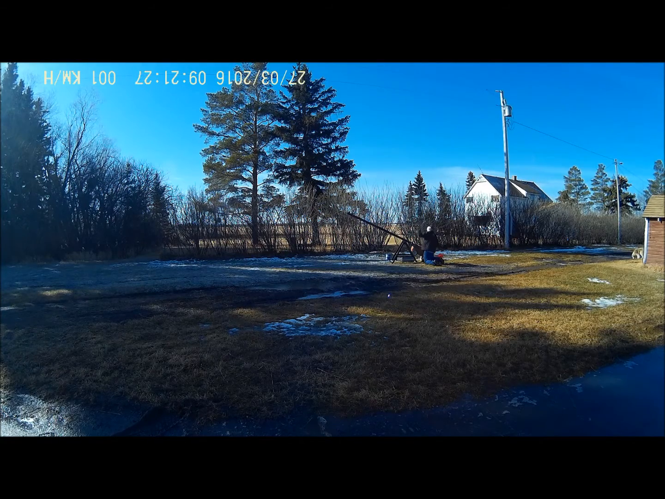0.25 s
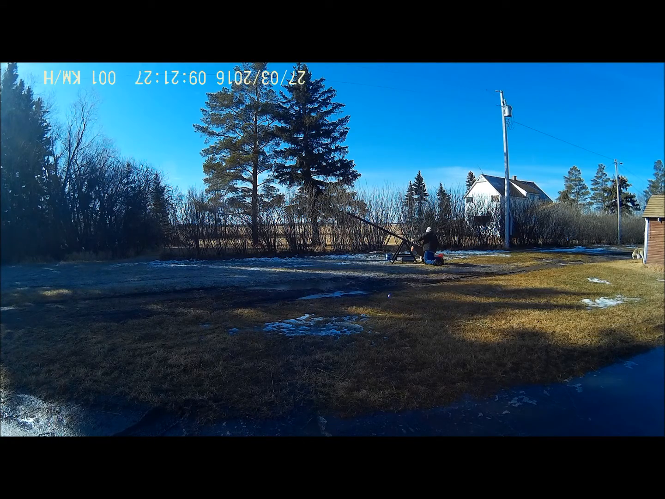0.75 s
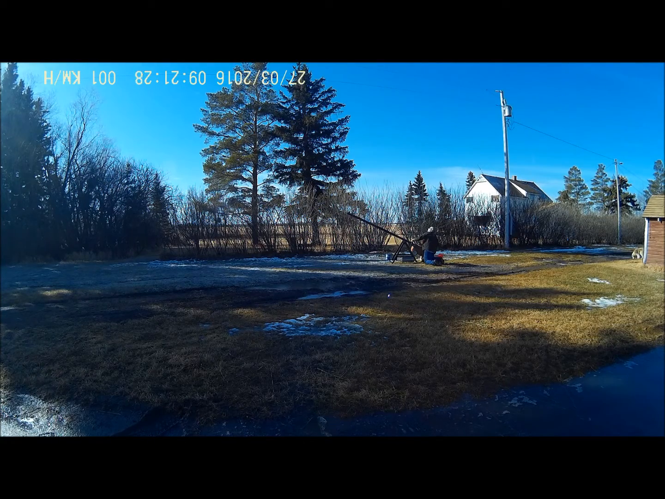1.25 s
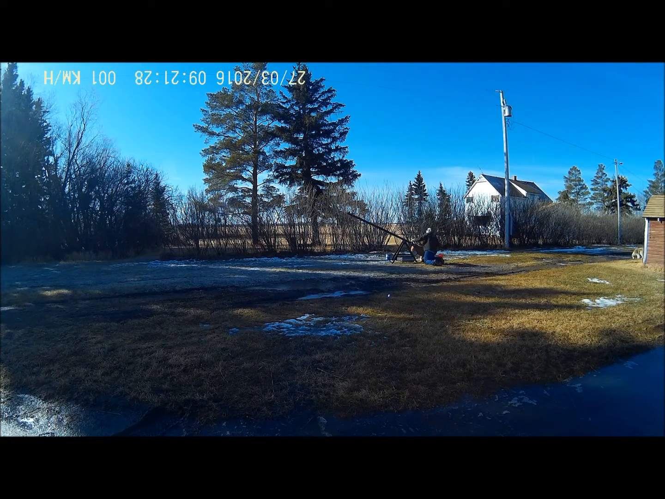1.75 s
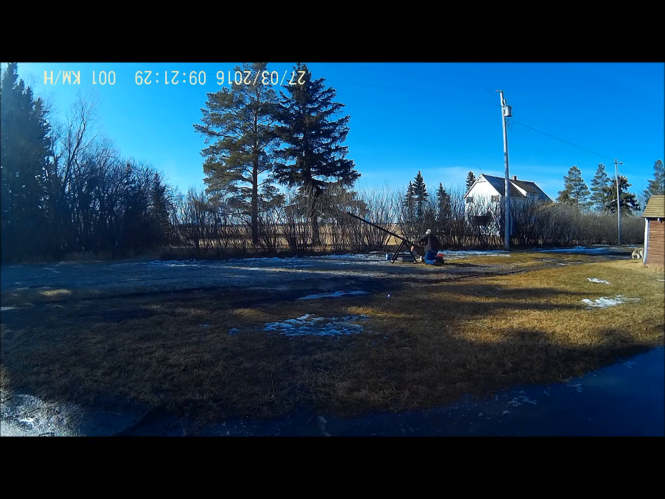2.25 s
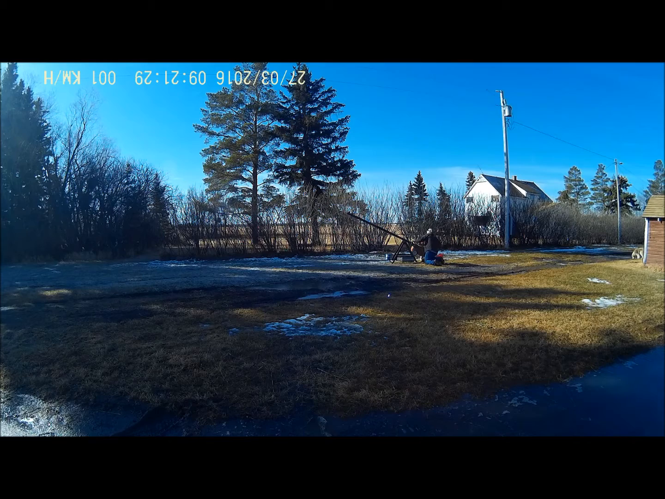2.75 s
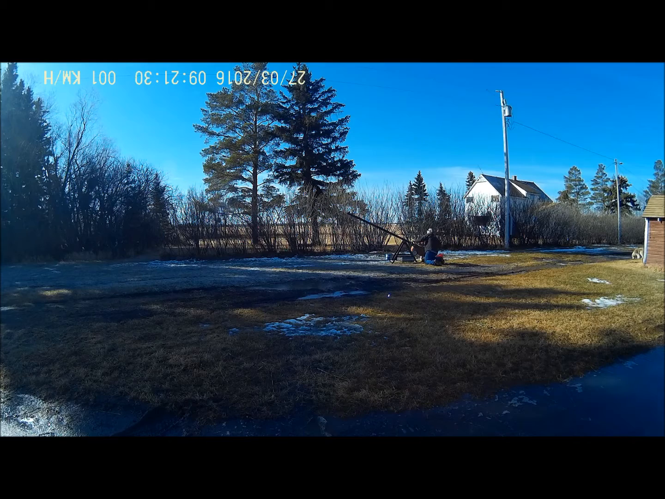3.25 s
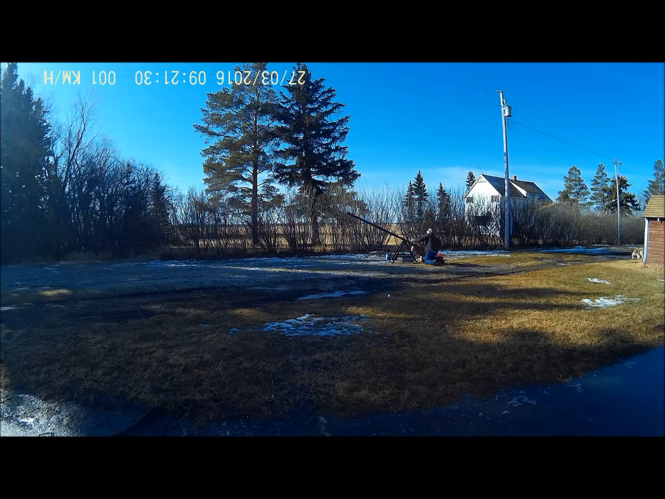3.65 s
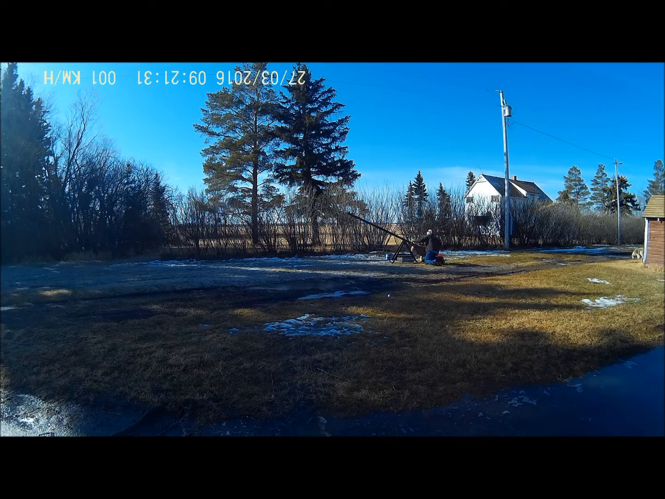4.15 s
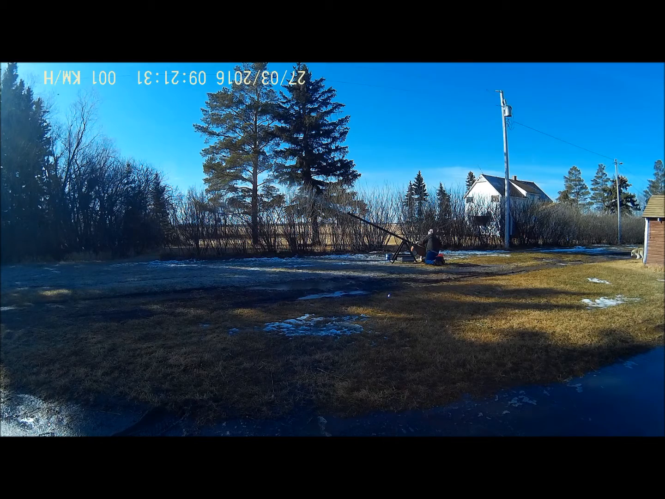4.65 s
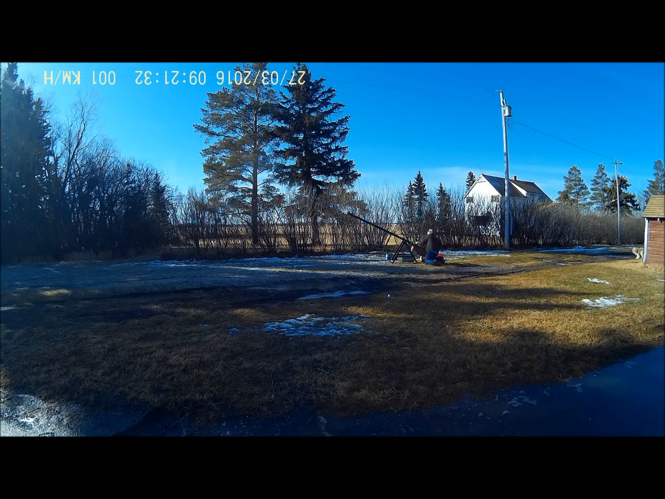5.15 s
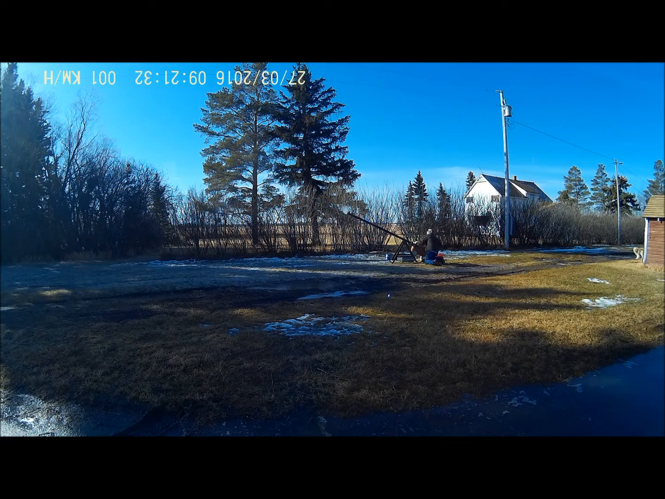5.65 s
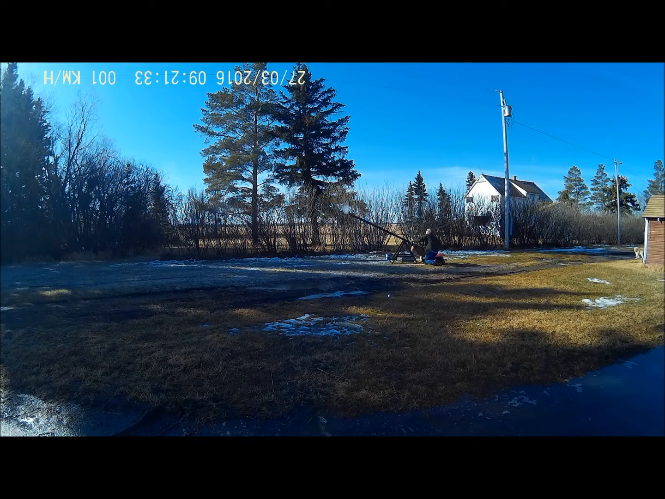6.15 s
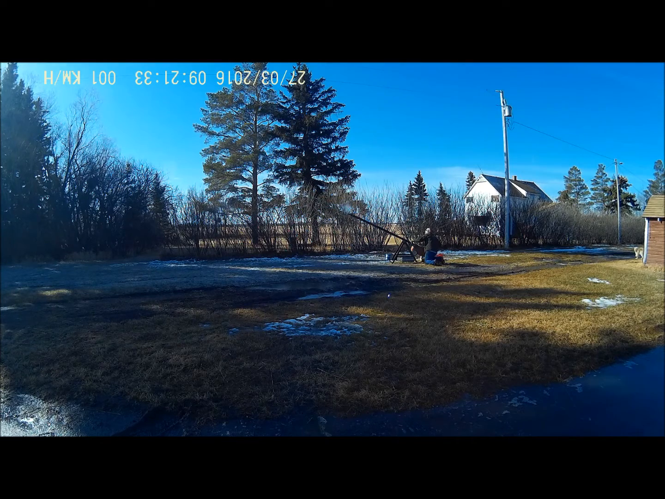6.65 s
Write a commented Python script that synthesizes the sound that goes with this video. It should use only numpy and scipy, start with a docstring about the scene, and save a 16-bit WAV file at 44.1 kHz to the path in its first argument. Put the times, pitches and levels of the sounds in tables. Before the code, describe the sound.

Faint songbird chirps and an occasional distant reedy call sit over quiet outdoor noise and a thin electronic buzz-whine. A compressed-air cannon across the yard suddenly fires: swelling hiss, sharp distorted crack, short boom, barrel note and rough rapid echo. Within a second come small clacks and one louder clattering thud, with a faint wavering ring afterward. Mono, slightly dull camera microphone.

```python
"""Compressed-air cannon in a farmyard

Air rushes down a barrel for about 80 ms (shaped noise), then bursts out as steep pressure fronts and a crack.
Trees and buildings return it as decaying noise; light knocks and a smaller bang follow (noise and modes).
Faint birds (gliding sines), low wind (noise) and a thin electronic whine (a restarted sine) lie underneath.
The small camera that hears it overloads: peaks are clipped, then the band is limited."""
import sys
import numpy as np
from scipy import signal
from scipy.fft import rfft, irfft
from scipy.io import wavfile
from scipy.ndimage import uniform_filter1d

SR = 44100
rng = np.random.default_rng(int(sys.argv[2]) if len(sys.argv) > 2 else 0)


def log_audio(samples):
    """Write samples as a 16-bit WAV file to the path given in sys.argv[1]."""
    # one column per channel
    frames = np.atleast_2d(samples).T
    # limit to full scale, then quantise
    limited = np.clip(frames, -1, 1)
    pcm = np.round(limited * 32767).astype(np.int16)
    wavfile.write(sys.argv[1], SR, pcm)


N = 304290
TIME = np.arange(N) / SR  # [s]
BINS = np.fft.rfftfreq(N, 1 / SR)  # [Hz]
VALVE_S, MUZZLE_S = 4.451, 4.533  # the valve opens; the air bursts from the muzzle


def amp(db):
    """Decibel law: converts a level to an amplitude gain."""
    return 10 ** (np.asarray(db) / 20)


def unit(x):
    """Normalization: scales a signal to rms 1."""
    return x / np.sqrt(np.mean(x ** 2) + 1e-20)


def colour(points, hz=BINS):
    """Spectral envelope: gain interpolated in decibels over log frequency."""
    f, db = np.transpose(points)
    return amp(np.interp(np.log(hz + 1), np.log(f + 1), db))


def resonances(peaks):
    """Resonance: bell-shaped gains around each frequency, summed in power."""
    power = sum((amp(db) / (1 + ((BINS - hz) / width) ** 2)) ** 2 for hz, width, db in peaks)
    return np.sqrt(power)


def noise(gain):
    """Filtered noise: white noise given a gain over frequency, at rms 1."""
    white = rng.standard_normal(N)
    return unit(irfft(rfft(white) * gain, N))


def steadied(x, size):
    """Envelope flattening: holds noise power steady over size samples, keeping the fine grain."""
    power = abs(uniform_filter1d(x ** 2, size))
    return x / np.sqrt(power + 1e-9)


def drift(rate_hz):
    """Random modulation: low-passed noise of rms 1."""
    return noise(np.exp(-(BINS / rate_hz) ** 2))


def ring(modes):
    """Modal decay: a sum of sines, each losing 60 dB in its t60."""
    t = TIME[:SR // 2]
    return sum(amp(db - 60 * t / t60) * np.sin(2 * np.pi * hz * t) for hz, db, t60 in modes)


def add(mix, s, sound):
    """Superposition: adds a sound into the mix at time s."""
    part = mix[max(round(s * SR), 0):][:len(sound)]
    part += sound[:len(part)]


def scatter(x, t60):
    """Diffuse reflection from ground and nearby walls: convolution with decaying noise."""
    t = TIME[:SR]
    decay = amp(-60 * t / t60) * (1 - np.exp(-t / 0.0024))
    taps = rng.standard_normal(SR) * decay
    return signal.fftconvolve(x, taps / np.linalg.norm(taps))[:N]


def swell(s, db, rise_db_per_s, fall_db_per_s, hold=0):
    """Exponential growth and decay: gain climbs to db at time s, holds, and dies away."""
    rise = rise_db_per_s * np.maximum(s - TIME, 0)
    fall = fall_db_per_s * np.maximum(TIME - s - hold, 0)
    return amp(db - rise - fall)


# spectrum of the outdoor air and the microphone's hiss: (frequency [Hz], relative density [dB per Hz])
AIR_COLOUR = [(20, -3), (60, -4), (125, 0), (200, -8.5), (300, -11.5), (480, -13), (750, -16.5),
              (1200, -20.5), (2300, -22.5), (7000, -24.5), (11000, -24.5), (15000, -26)]
AIR_DB = -61.5


def background():
    """Broadband ambience: outdoor air over microphone hiss, low gusts and a rumble that dies away."""
    air = amp(AIR_DB) * noise(colour(AIR_COLOUR))
    gust_colour = colour([(20, -4), (120, 1.0), (200, -5.0), (500, -36.5), (2000, -70)])
    gusts = amp(-73.5 + 3.3 * drift(4.9)) * noise(gust_colour)
    rumble_colour = colour([(80, -54), (480, 10), (850, -3.5), (1600, -24), (5000, -47)])
    rumble = noise(rumble_colour) * swell(0, -70, rise_db_per_s=0, fall_db_per_s=16.5, hold=0.37)
    return air + gusts + rumble


WHINE_HZ, FRAME_HZ, WHINE_DB = 7933, 60.324, -69.5


def whine():
    """Periodic phase reset: a tone restarts each camera frame and buzzes; it swells after the blast."""
    surge = swell(4.69, -56.5, rise_db_per_s=95, fall_db_per_s=101, hold=0.054)
    settling = swell(4.8, -70.5, rise_db_per_s=95, fall_db_per_s=29, hold=0.35)
    time_in_frame = TIME % (1 / FRAME_HZ)
    tone = np.sqrt(2) * np.sin(2 * np.pi * WHINE_HZ * time_in_frame)
    return tone * (amp(WHINE_DB) + surge + settling)


# drawn-out calls: (time [s], length [s], base partial at mid-call [Hz], level [dB],
# overtone strength [dB])
FAR_CALLS = [(.075, 0.31, 1792, -68, -20), (3.252, 0.26, 1780, -71, -6.5), (3.5, 0.07, 1760, -64, -25),
             (4.35, 0.24, 1800, -71.5, 2.5)]
# reedy overtones: (multiple of the base partial, relative level [dB])
FAR_OVERTONES = [(1.5, -1.5), (2, -1.5)]
FAR_SAG_HZ_PER_S = 69


def far_bird(uneven_db=1.8):
    """Partial series: a far bird's reedy calls, each one wavering note that sinks slightly."""
    out, waver = np.zeros(N), 1 + 0.0089 * drift(58)
    for s, length, hz, db, reed_db in FAR_CALLS:
        t = np.arange(0, length, 1 / SR)
        sinking_hz = hz - FAR_SAG_HZ_PER_S * (t - length / 2)
        phase = 2 * np.pi * np.cumsum(sinking_hz * np.interp(s + t, TIME, waver)) / SR
        overtones = sum(amp(part_db) * np.sin(k * phase) for k, part_db in FAR_OVERTONES)
        call = unit(np.sin(phase) + amp(reed_db) * overtones)
        add(out, s, amp(db) * call * signal.windows.tukey(len(t), .3))
    return out * amp(uneven_db * drift(25))


# syllables sung: (time [s], kind, level [dB], pitch factor)
SONG = [(.236, "chirrup", -64, 1.005), (0.664, "slide", -70, 0.89), (.745, "slur", -67.5, 0.98),
        (1.006, "slur", -71, 1.37), (1.11, "flick", -71, 0.97), (1.202, "twitter", -58.5, 1),
        (1.636, "slur", -66, .98), (1.9, "chirrup", -64, 1.01), (2.079, "slur", -69.5, 1.3),
        (2.185, "flick", -68, 0.94), (2.437, "slur", -68, .96), (2.54, "slide", -74, 1.13),
        (2.856, "twitter", -60, 0.99), (3.125, "slide", -67.5, 0.92), (3.201, "slur", -68, 0.98),
        (3.452, "flick", -70, 1.2), (3.468, "slur", -67.5, 1.39), (3.568, "flick", -67, 0.97),
        (3.595, "slide", -76, 1.1), (3.933, "twitter", -62.5, 1), (4.03, "slur", -67, 1.38),
        (4.112, "slur", -67.5, 0.95)]
# notes of each kind of syllable: (delay [s], length [s], first pitch [Hz], last pitch [Hz],
# arch height [Hz], relative level [dB]); the pitch factor scales all three pitches
SYLLABLES = { "chirrup": [(0, .053, 3650, 3350, 1850, 3), (.056, .02, 3550, 3400, 0, -2.5),
             (.081, .029, 3340, 4480, 3, -1.5)], "twitter": [(0, .023, 5900, 3730, 706, -3.5),
             (.021, .022, 6100, 5480, -3, -1), (.036, .031, 3900, 3800, 2100, -2.5),
             (.066, .062, 5473, 6100, 0, -7)], "slur": [(.006, .064, 2897, 2300, 421.2, -1)],
             "slide": [(0, .075, 4800, 3150, 0, -4)], "flick": [(0, 0.0306, 3500, 4200, 195, 0)]}
ARCH_FLATNESS = 2.4  # 2 is a round arch; more flattens its top


def songbird(flutter=.013, flutter_db=2.0):
    """Frequency modulation: a small bird's fluttering whistles glide between pitches over an arch."""
    out = np.zeros(N)
    waver, tremble = 1 + flutter * drift(180), amp(flutter_db * drift(90))
    for s, kind, db, pitch in SONG:
        for delay, length, first_hz, last_hz, arch_hz, note_db in SYLLABLES[kind]:
            u = np.linspace(0, 1, round(length * SR))
            arch = arch_hz * (1 - abs(2 * u - 1) ** ARCH_FLATNESS)
            hz = pitch * (first_hz + (last_hz - first_hz) * u + arch)
            turns = np.cumsum(hz * np.interp(s + delay + u * length, TIME, waver)) / SR
            note = np.sin(2 * np.pi * turns) * signal.windows.tukey(len(u), .4)
            add(out, s + delay, amp(db + note_db) * note)
    return out * tremble


def birds():
    """Multiple scattering: the trees soften both birds by adding diffuse reflections."""
    calls = songbird() + far_bird()
    return calls + amp(-8.5) * scatter(calls, t60=0.37)


# contacts after the shot: (time [s], crunch level [dB], contact length [s],
# thud relative to crunch [dB], pitch factor)
KNOCKS = [(4.788, -32, 0.0018, -25, 1.2), (4.948, -47.5, 0.0068, -25, 1), (5.078, -42, 0.0074, -11, 1.7),
          (5.084, -37.5, 0.0067, -4.5, 1.5), (5.105, -34.5, 0.0022, -3, 1.6),
          (5.2051, -33, 0.01, -23, 0.84), (5.2146, -23.5, 0.0037, 4.5, 1), (5.219, -25, 0.0042, -12, 1.1),
          (5.284, -49, .004, -15, 1.1)]
# spectrum of the crunch: (frequency [Hz], relative density [dB per Hz])
KNOCK_COLOUR = [(60, -14.5), (200, -9), (520, -5), (700, -3), (870, 3), (1150, -0.5), (1500, 4),
                (2100, -13), (3700, -10), (5200, -16), (9500, -20.5), (15500, -42)]
# modes of the struck thing, before the pitch factor: (frequency [Hz], relative level [dB], t60 [s])
STRUCK_MODES = [(233, -13, 0.035), (532, -12, 0.078), (583, 0.5, 0.042), (820, -10.5, 0.045),
                (1157, -11, 0.049), (1433, -9, 0.056), (2456, -18, 0.066), (3630, -26, 0.057)]


def knocks(rattle_db=-16, rattle_t60=0.19):
    """Impact excitation: crunching contacts ring the struck thing's modes and trail a fine rattle."""
    out, t = np.zeros(N), TIME[:SR // 2]
    bass_loss = signal.butter(2, 300, "high", fs=SR, output="sos")  # small things radiate little bass
    for s, db, length, thud_db, pitch in KNOCKS:
        modes = [(hz * pitch, mode_db, t60) for hz, mode_db, t60 in STRUCK_MODES]
        thud = signal.sosfilt(bass_loss, ring(modes))
        crunch = steadied(noise(colour(KNOCK_COLOUR))[:len(t)], size=200)
        contact = np.exp(-(t / length) ** 2) * (1 - np.exp(-t / 0.0011))
        rattle = amp(rattle_db - 60 * t / rattle_t60) * (1 - np.exp(-t / length))
        add(out, s, amp(db) * (crunch * (contact + rattle) + amp(thud_db) * thud))
    return out + amp(-12) * scatter(out, t60=0.28)


# ringing that hangs in the air: (frequency at 5.55 s [Hz], level before the shared swell [dB])
AFTERRING = [(829, -78.5), (995, -77), (1244, -92), (1400, -104), (1680, -74.5)]


def afterring(rise=0.03, waver=0.011):
    """Lingering tones: faint sines waver at random and creep up in pitch after the shot."""
    glide = 1 + rise * np.clip(TIME - 5.55, -1, 1)
    tones = np.zeros(N)
    for hz, db in AFTERRING:
        wavering_hz = hz * glide * (1 + waver * drift(48.4))
        tones += amp(db + 2 * drift(30)) * np.sin(2 * np.pi * np.cumsum(wavering_hz) / SR)
    return tones * swell(5.33, 5.0, rise_db_per_s=102, fall_db_per_s=42, hold=0.4)


# spectrum of the returns: (frequency [Hz], relative density [dB per Hz])
ECHO_COLOUR = [(30, -23.5), (120, -11.5), (205, -5), (290, -14.5), (380, -8), (470, -8), (800, -3.5),
               (1280, -1.5), (1700, -4.5), (2200, -17.5), (3600, -21.5), (5500, -31), (9000, -41),
               (15500, -48.5)]
# resonances in the returns: (frequency [Hz], width [Hz], relative level [dB])
ECHO_RING = [(213.8, 13, -1), (365, 18, -3), (1020, 24, -0.5), (1273, 35, 4.5), (1500.5, 40, -4.5),
             (3047, 70, -14), (3620, 62, -19)]
# main echoes from tree lines and buildings: (time [s], level [dB])
ECHOES = [(4.592, -22.5), (4.622, -23), (4.648, -23.5), (4.671, -26), (4.722, -29), (4.765, -40),
          (4.828, -40.5), (4.865, -44), (4.928, -46.5)]
ECHO_RISE_DB_PER_S, ECHO_FALL_DB_PER_S = 420.5, 216  # the fall is for the main echoes
COUNTRY_DB, COUNTRY_FALL_DB_PER_S = -45, 22.5  # long tail from the land beyond


def yard_echo(bright_db=0.5, dulling_db_per_s=4, patchy_db=1.0):
    """Diffuse reverberation: trunks and walls return the blast; later returns have lost some treble."""
    plain = steadied(noise(colour(ECHO_COLOUR)), size=1200)
    resonant = steadied(noise(resonances(ECHO_RING)), size=1200)
    returns = unit((plain + amp(-5.5) * resonant) * amp(patchy_db * drift(120)))
    body = signal.sosfiltfilt(signal.butter(2, 2100, fs=SR, output="sos"), returns)
    treble_gain = amp(bright_db - dulling_db_per_s * np.clip(TIME - MUZZLE_S, 0, .45))
    # echoes add in power
    near = sum(swell(s, db, ECHO_RISE_DB_PER_S, ECHO_FALL_DB_PER_S) ** 2 for s, db in ECHOES)
    far = swell(4.62, COUNTRY_DB, ECHO_RISE_DB_PER_S, COUNTRY_FALL_DB_PER_S) ** 2
    return (body + treble_gain * (returns - body)) * np.sqrt(near + far)


def barrel_tone(hz=1312):
    """Pipe resonance: the emptying barrel sings one wavering note and stops; the yard carries it on."""
    phase = 2 * np.pi * np.cumsum(hz * (1 + 0.0081 * drift(60))) / SR
    direct = swell(4.69, -35, rise_db_per_s=60, fall_db_per_s=1200, hold=0.091) * (TIME > MUZZLE_S)
    carried = swell(4.72, -47, rise_db_per_s=200, fall_db_per_s=140, hold=.15)
    return np.sin(phase) * amp(2 * drift(40)) * (direct + carried)


# spectrum of the rushing air, also heard in the puff: (frequency [Hz], relative density [dB per Hz])
RUSH_COLOUR = [(60, -22.5), (400, -7.5), (700, 2), (1400, 1), (1750, -0.5), (2200, -14.5), (3600, -15),
               (5000, -21), (8000, -26), (11000, -27.5), (15500, -36)]


def puff(db=-19.5, hold=0.013):
    """Jet noise: air packed in the barrel escapes in one short puff just behind the burst."""
    rush = steadied(noise(colour(RUSH_COLOUR)), size=400)
    return rush * swell(4.535, db, rise_db_per_s=2999, fall_db_per_s=1300, hold=hold)


def jet(db, power, fall_db_per_s):
    """Power law of flow: gain grows from valve to muzzle, then falls as the tank runs empty."""
    flow = np.clip((TIME - VALVE_S) / (MUZZLE_S - VALVE_S), 0, 1)
    return flow ** power * amp(db - fall_db_per_s * np.maximum(TIME - MUZZLE_S, 0))


# spectrum of the low boom: (frequency [Hz], relative density [dB per Hz])
BOOM_COLOUR = [(20, -25.5), (70, -24), (118, 1), (155, -10), (215, 3), (400, -11.5), (600, -3),
               (900, -11.5), (1400, -31), (4000, -59)]
# barrel resonances: (frequency [Hz], width [Hz], relative level [dB])
BARREL = [(310, 25, -1.5), (678.6, 17, -1), (1320, 47, 9), (1544, 56, -5.5), (3480, 86, -10),
          (3850, 120, -13), (6990, 160, -21.5)]
# how each sound follows the flow: (level at the muzzle [dB], power of its growth, fall [dB per s])
RUSH_LAW = (-22, 0.95, 240)
BOOM_LAW = (-12.5, 2.3, 470)
WHISTLE_LAW = (-24, 1, 330)


def discharge():
    """Turbulent pipe flow: the jet swells, whistles in the barrel's resonances and booms at the muzzle."""
    rush = steadied(noise(colour(RUSH_COLOUR)), size=400)
    boom = steadied(noise(colour(BOOM_COLOUR)), size=700)
    whistle = steadied(noise(resonances(BARREL)), size=600)
    return rush * jet(*RUSH_LAW) + boom * jet(*BOOM_LAW) + whistle * jet(*WHISTLE_LAW)


# pressure fronts at the muzzle, before filtering: (time [s], level [dB], length [s])
FRONTS = [(4.5299, -5, 0.0004), (4.5333, 3, .00035), (4.5344, 6, .00035)]
# modes of the muzzle: (frequency [Hz], relative level [dB], t60 [s])
MUZZLE_MODES = [(119, -25, 0.08), (204.3, -16.5, 0.12), (640.7, -1.5, 0.025), (986, -4, .03),
                (1580, -16.5, 0.041), (3030, -12.5, 0.013)]
# spectrum of the crack: (frequency [Hz], relative density [dB per Hz])
CRACK_COLOUR = [(60, -24), (380, -13), (650, 12.5), (1000, -1.5), (1400, -9.5), (2300, -17.5), (3100, -13),
                (5500, -26.5), (9000, -37), (15500, -39.5)]


def burst(crack_db=-1, crack_length=.0018):
    """Blast wave: steep fronts each followed by suction, a tearing crack and the muzzle's ring."""
    out = np.zeros(N)
    for s, db, length in FRONTS:
        u = TIME[:SR // 10] / length
        add(out, s, amp(db) * (1 - u) * np.exp(-u))
    # the way across the yard rounds the fronts
    out = signal.sosfilt(signal.butter(2, 1800, fs=SR, output="sos"), out)
    # the second front starts the ring
    add(out, FRONTS[1][0], amp(2.5) * ring(MUZZLE_MODES))
    crack_shape = np.exp(-((TIME - 4.534) / crack_length) ** 2)
    crack = steadied(noise(colour(CRACK_COLOUR)), size=100) * crack_shape
    # so small a muzzle radiates little deep bass
    bass_loss = signal.butter(1, 60, "high", fs=SR, output="sos")
    return signal.sosfilt(bass_loss, out + amp(crack_db) * crack)


def scene():
    """Superposition: the whole yard summed in mono."""
    surroundings = background() + whine() + birds()
    shot = afterring() + yard_echo() + barrel_tone() + puff() + discharge() + burst()
    return (surroundings + knocks() + shot)[None]


def record(dry):
    """Overload and band limit: the input clips peaks, then a low-pass removes the top treble."""
    clipped = np.clip(dry, -.97, .97)
    band_limit = signal.firwin(301, 15600, window=("kaiser", 8), fs=SR)  # cutoff in Hz
    return signal.oaconvolve(clipped, band_limit[None], "same")


dry = scene()
out = record(dry)
log_audio(out)
```